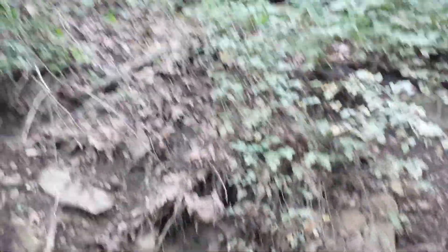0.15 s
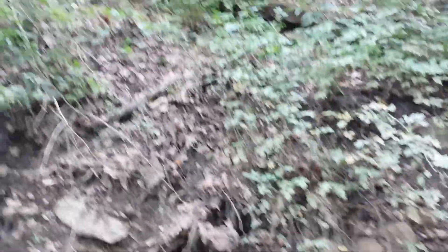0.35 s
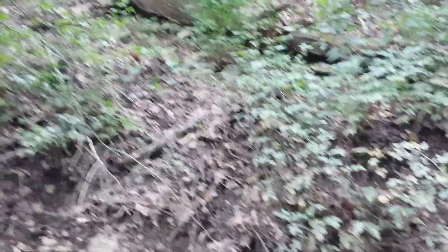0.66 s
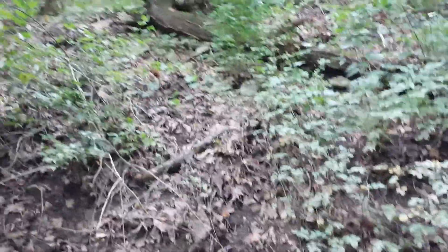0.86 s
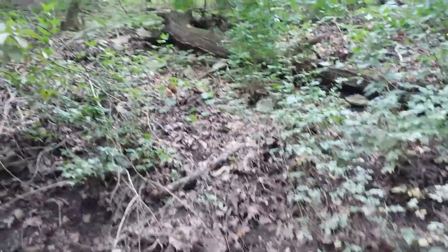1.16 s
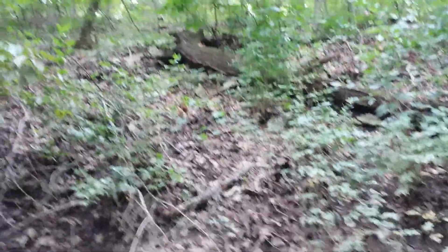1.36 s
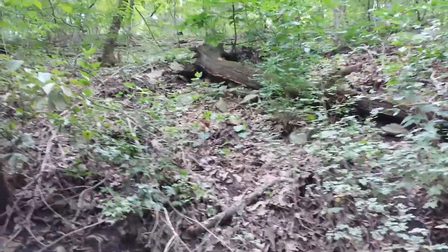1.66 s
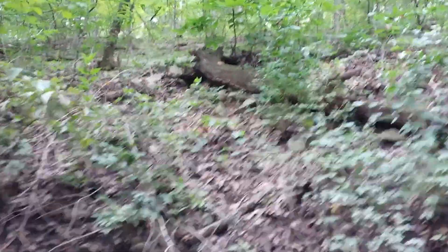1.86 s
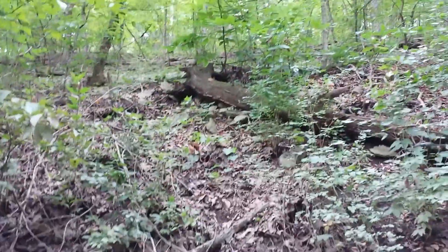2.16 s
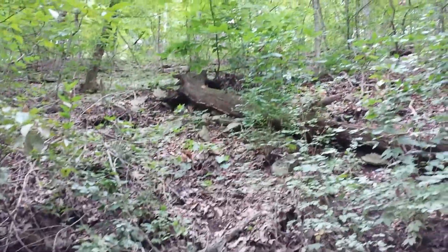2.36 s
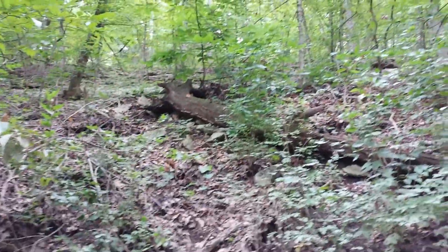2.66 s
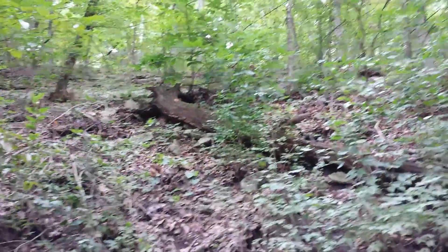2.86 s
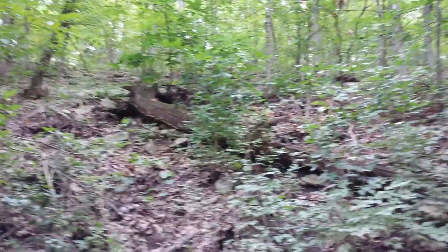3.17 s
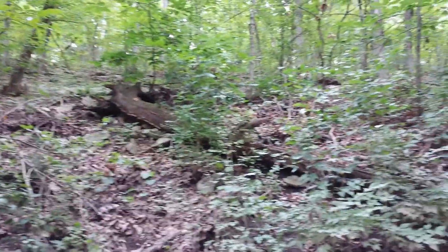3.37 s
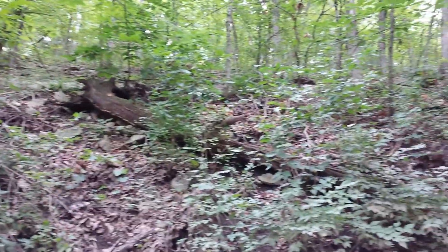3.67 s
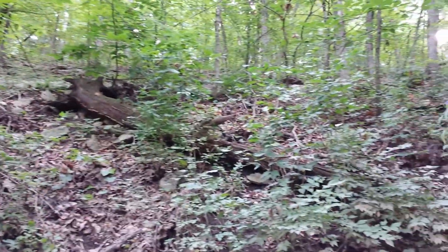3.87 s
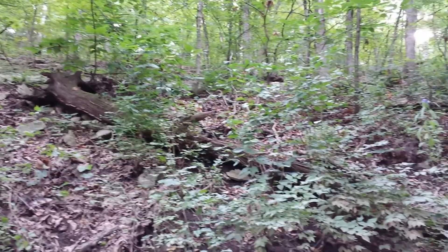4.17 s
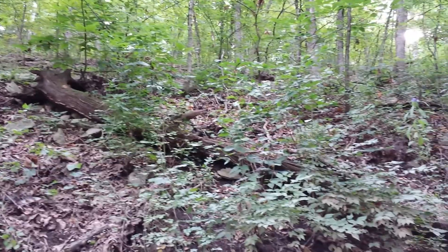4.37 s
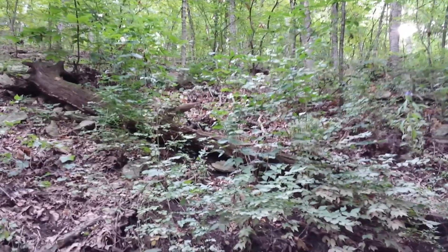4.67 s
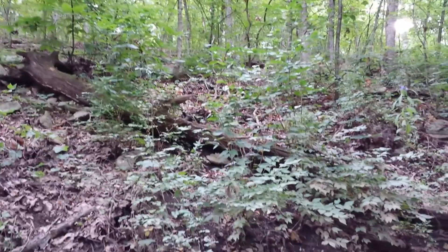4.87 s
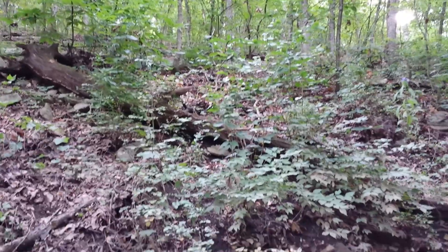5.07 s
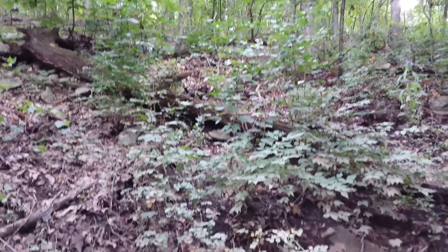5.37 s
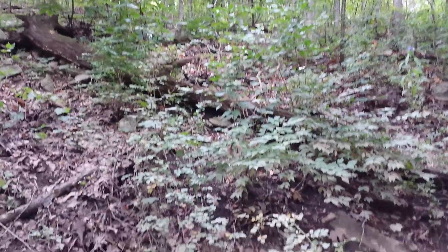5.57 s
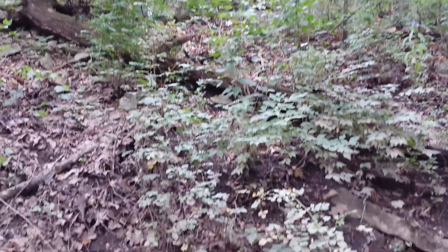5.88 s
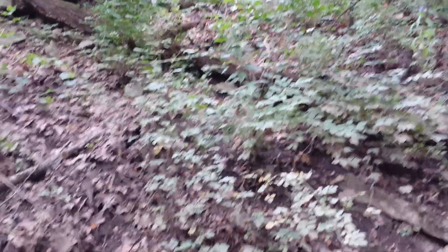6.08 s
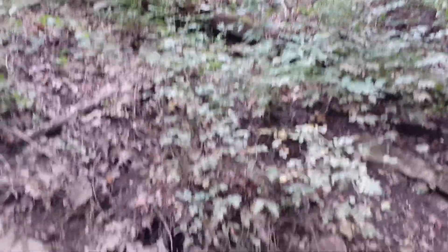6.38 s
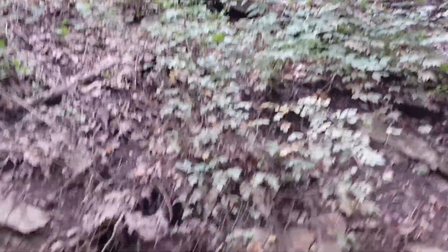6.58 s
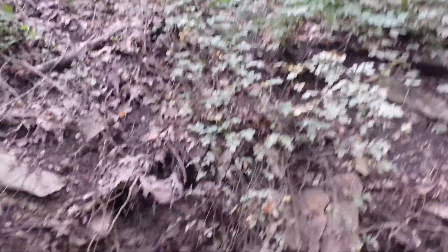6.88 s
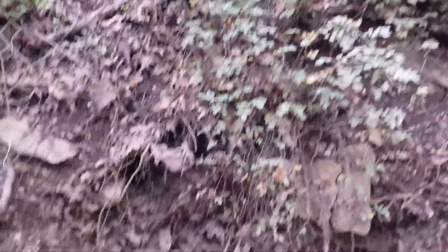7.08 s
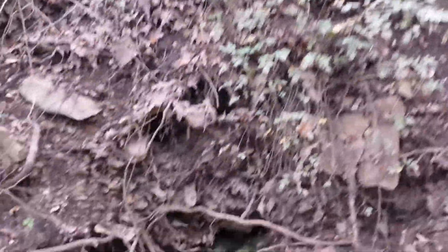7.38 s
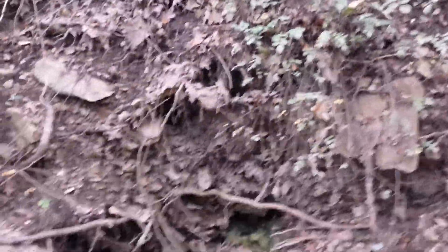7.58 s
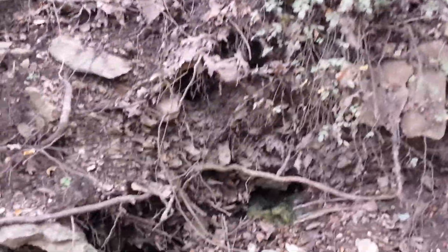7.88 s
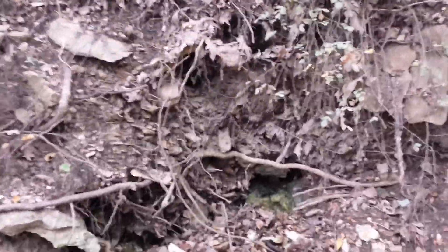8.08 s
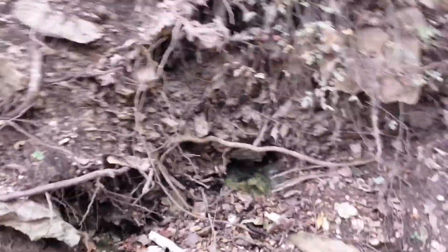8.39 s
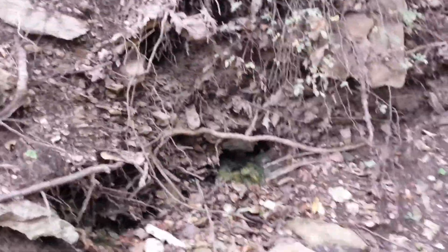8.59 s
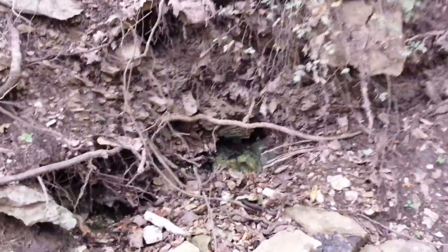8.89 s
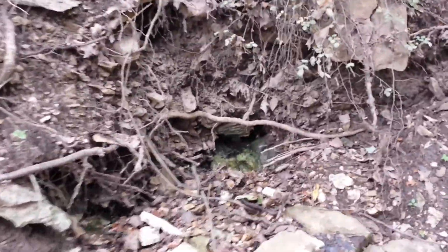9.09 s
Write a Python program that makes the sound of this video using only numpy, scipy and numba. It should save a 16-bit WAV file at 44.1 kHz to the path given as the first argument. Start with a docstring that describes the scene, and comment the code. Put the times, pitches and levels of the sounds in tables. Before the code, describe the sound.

Crickets keep up a high, even drone in the woods, one nearer insect pulsing above the rest, with a soft tree hush and low distant traffic behind. Occasional leaf ticks, two short katydid rasps and some faint hollow clucking dot the wide stereo background. After about seven seconds a nearby walker sets off, and dry leaves and twigs crackle underfoot until the end.

```python
"""Summer woodland on two spaced microphones. From the start far traffic rumbles under the hush of the
trees, a distant choir of crickets drones near 5.3 kHz and one closer cricket trills, wing stroke by
wing stroke. A walker shifts in dry leaves and twigs. A katydid rasps just before 2 s; from 2.5 s
something small clucks off to the left; the katydid rasps again near 6.7 s. From 7 s the walker steps
out, and leaves and twigs crack underfoot to the end."""
import sys
import numpy as np
from scipy import signal
from scipy.fft import rfft, irfft, next_fast_len
from scipy.io import wavfile
from scipy.ndimage import uniform_filter1d
from numba import njit

SR = 44100
rng = np.random.default_rng(int(sys.argv[2]) if len(sys.argv) > 2 else 0)


def master(y):
    """Save y as 16-bit WAV."""
    cut = np.clip(np.atleast_2d(y).T, -1, 1)
    pcm = np.round(cut * 32767)  # scale
    wavfile.write(sys.argv[1], SR, pcm.astype(np.int16))


N = 407043
T = np.arange(N) / SR
MIC_LAG_S = 0.000282  # sound from the left reaches the right microphone this much later

# far traffic, peaking twice in the bass: (frequency [Hz], relative density [dB])
DRONE = [(20, -22), (40, -13), (60, -5), (70, 1.5), (80, -4), (97, -2), (105, 2), (115, -4.5)]
# that drone with the hush of the trees above it: (frequency [Hz], relative density [dB])
HUSH_SPECTRUM = DRONE + [(180, -2.5), (300, -12.5), (600, -14.0), (1200, -16), (2200, -22), (4000, -24),
                 (8000, -25.0), (14500, -26.0)]
# how alike the hush is at the two microphones: (frequency [Hz], coherence [0-1])
HUSH_COHERENCE = [(60, .74), (290, .62), (640, .5), (1200, .4), (2500, .2), (5000, 0)]
# where the hush sits: (frequency [Hz], left minus right [dB])
HUSH_PAN = [(60, 0), (700, 1), (2400, 2.5), (8000, -10.5), (15000, 1)]
# traffic passing: (time [s], gain up to about 130 Hz [dB], gain from there to about 260 Hz [dB])
TRAFFIC_SWELL = [(0, -1.5, -1.5), (1.4, -0.5, -3), (1.95, 0.5, 2), (3.2, -1, -2.5), (3.9, 1, -4),
                 (4.5, -2.5, 5), (5.3, 2, -2), (7, 0, -1.5), (7.6, 2.5, 1), (9.23, 2.5, -2)]
# distant crickets: (wing pitch [Hz], relative level [dB])
CHOIR_SPECTRUM = [(4200, -39), (4500, -23), (4850, -11.5), (5150, -6.5), (5350, -4.5), (5550, -6.5),
                  (5750, -9.5), (6100, -16), (6400, -15.5), (6700, -23), (7400, -40)]
# the whole choir swelling: (time [s], level [dB], left minus right [dB])
CHOIR_SWELL = [(0.0, -47.5, 3.5), (1.69, -46.5, 4.5), (4.06, -47, 3.5), (4.42, -48, 7), (6.01, -46.5, 2.5),
               (9.23, -45.5, 2.5)]
# near cricket, swelling and fading among the leaves: (time [s], stroke peak [dB], left minus right [dB])
TRILL_SWELL = [(0, -52, 1), (.7, -42, -3), (1.3, -45.5, -7), (1.5, -36.5, 6), (1.8, -39.5, 1),
               (2.2, -53, -19), (3.1, -40, 6), (3.7, -52, 5), (4.4, -40, -4), (5.1, -40.5, 5),
               (5.8, -47.5, -15), (6.6, -51.5, 24), (7.4, -42.5, -8), (7.8, -52, 7), (8.6, -39, 7),
               (9.23, -46, 11)]
# weight coming down on the leaves: (start [s], hold [s], crunch [dB], crisp treble [dB])
TREADS = [(0, 0.23, -72, -78), (1.387, 0.21, -63, -60), (1.87, 0.13, -61, -66), (2.366, 0.046, -60, -60),
          (3.238, 0.065, -62, -61), (7.165, 0.19, -61.5, -62), (7.381, 0.23, -54, -54.5),
          (7.668, 0.066, -54, -58.5), (7.794, 0.26, -51.5, -48.5), (8.111, 0.18, -53.5, -49),
          (8.355, 0.12, -47.5, -44.5), (8.518, 0.093, -53, -55), (8.793, 0.013, -53, -48.5),
          (8.92, 0.053, -60, -60), (9.051, 0.036, -44.5, -45.5), (9.128, 0.085, -48.5, -50.5)]
# low and middle cracks of dry leaves: (centre [Hz], spread [octaves], relative level [dB], ring [cycles])
CRUNCH_MODES = [(463, 0.55, -7.5, 0.8), (1383, 0.33, 0.5, 1.4), (2453, 0.36, -0.5, 1.5),
                (3854, 0.19, -4, 6.6)]
# treble cracks of dry leaves: (centre [Hz], spread [octaves], relative level [dB], ring [cycles])
CRISP_MODES = [(7100, 0.11, 0, 7.6), (9000, 0.14, -2, 7.1), (11500, 0.22, -25, 3.0)]
# brittle leaves breaking: (time [s], peak [dB], pitch [Hz], left minus right [dB])
LEAF_TICKS = [(1.3918, -39, 7000, -1), (1.4976, -36.5, 7900, -4), (2.3756, -30.5, 7170, 7),
              (2.4035, -44, 7240, 9), (2.68, -44, 7200, 11), (3.2661, -47, 7380, 8), (3.3005, -45, 7110, 6),
              (4.188, -47, 7500, 7), (4.4574, -42, 7160, 5), (5.8397, -40.5, 8500, .5),
              (6.6564, -47, 8050, 7), (6.9791, -43, 6890, 5), (7.0415, -38, 7460, 1),
              (7.6936, -39, 7100, 1), (7.8053, -33, 7170, 8), (7.843, -39, 7100, 2.),
              (7.8921, -30, 7040, 7), (7.9465, -33, 7060, 9), (7.975, -33, 7500, 6),
              (8.0772, -39, 6960, 14), (8.1416, -33.5, 7300, 11), (8.1815, -41, 7040, 8),
              (8.2498, -32, 8100, -11), (8.397, -35, 7380, 2.5), (8.5691, -34, 6900, 8),
              (8.769, -45, 6850, 3), (8.7961, -36, 8750, 1), (9.03, -36, 6990, 9), (9.0542, -28, 7230, 8),
              (9.0789, -28, 7100, 9), (9.1409, -22, 7020, 6.5)]
# twigs, dull thuds to bright taps, before panning: (time [s], peak [dB], pitch [Hz], click peak [dB])
TWIG_KNOCKS = [(0.159, -48, 1700, -60), (.255, -50, 1500, -60), (.59, -49, 1300, -62),
               (1.3915, -49, 1480, -47), (1.4965, -34, 1420, -38), (2.3749, -39, 1390, -32),
               (2.403, -46, 1470, -48), (3.2805, -49, 1310, -50), (4.3117, -45.5, 3840, -58),
               (4.4558, -46, 990, -35), (4.5873, -45, 3680, -58), (4.7836, -46.5, 3770, -58),
               (5.8903, -42.5, 295, -50), (5.914, -48, 1000, -44), (6.5112, -44, 1270, -50),
               (7.168, -41, 1670, -44), (7.408, -44, 1740, -43), (7.571, -41, 1110, -44),
               (7.588, -35.5, 1270, -38), (7.694, -35.5, 840, -30), (7.784, -39.5, 1660, -44),
               (7.806, -37, 1120, -36), (7.842, -26, 1700, -31), (7.869, -28, 1240, -36),
               (7.891, -32.5, 1360, -38), (7.916, -38, 1180, -44), (7.934, -33, 1230, -38),
               (7.976, -38, 1200, -34), (8.003, -31.5, 1460, -37), (8.069, -33, 1310, -26),
               (8.226, -40.5, 1830, -44), (8.346, -40, 800, -35), (8.406, -35.5, 1100, -32),
               (8.433, -28, 2100, -38), (8.538, -29.5, 2500, -42), (8.598, -36, 1930, -38),
               (8.615, -48, 1430, -41), (8.772, -40.5, 1010, -33), (8.795, -42, 1890, -44),
               (8.949, -43.5, 1270, -50), (9.036, -38, 3430, -38), (9.048, -35, 408, -36),
               (9.053, -27, 3800, -36), (9.08, -32.5, 1320, -26), (9.095, -37, 1700, -40),
               (9.134, -42.5, 246, -42), (9.179, -41, 1950, -42)]
# a katydid's short high rasps: (start [s], length [s], pitch [Hz], peak of one scrape [dB])
KATYDID_RASPS = [(1.875, .12, 9240, -64), (6.732, .24, 8600, -61)]
# the clearest clucks, before panning: (time [s], peak [dB])
CLUCKS = [(2.823, -54), (3.1762, -55), (3.3824, -58), (3.4527, -54), (3.5064, -55), (3.604, -53),
          (3.6886, -55), (3.8747, -55), (3.9483, -57), (4.19, -57), (4.4924, -51), (4.9011, -53),
          (5.248, -54), (5.301, -47), (5.504, -55), (5.654, -55), (5.8512, -49.5), (6.0183, -51.5),
          (6.249, -54)]


def undb(db):
    """Decibels to amplitude."""
    return 10 ** (np.asarray(db) / 20)


def level(x, db):
    """Scale to an RMS level."""
    return x * undb(db) / np.sqrt(np.mean(x ** 2))


def read(table, at, log=False):
    """Columns of a table, joined by straight lines."""
    key, *columns = np.transpose(table)
    return [np.interp(np.log(at), np.log(key), c) if log else np.interp(at, key, c) for c in columns]


def wander(rate_hz):
    """Random values held for 1 / rate_hz seconds and smoothed twice; spread near 1."""
    hold = int(SR / rate_hz)
    steps = np.repeat(rng.standard_normal(N // hold + 1), hold)
    return 0.96 * uniform_filter1d(uniform_filter1d(steps, hold), hold)[:N]


@njit
def add_grains(out, times, hz, rise, fall, peak, phase):
    """Add tones that swell over rise seconds and die over fall seconds, each with the given peak."""
    for g in range(len(times)):
        turn = 2j * np.pi * hz[g] / SR
        slow_step = np.exp(turn - 1 / (fall[g] * SR))
        fast_step = np.exp(turn - (1 / fall[g] + 1 / rise[g]) / SR)
        ratio = rise[g] / fall[g]
        slow = fast = peak[g] * (1 + ratio) / (ratio / (1 + ratio)) ** ratio * np.exp(1j * phase[g])
        start = max(int(times[g] * SR), 0)
        for i in range(start, min(start + int(7 * fall[g] * SR), len(out))):
            out[i] += (slow - fast).imag
            slow, fast = slow * slow_step, fast * fast_step


def grains(times, hz, rise_s, fall_s, db, phase=0):
    """One channel of short ringing tones."""
    out = np.zeros(N)
    columns = np.broadcast_arrays(times, np.clip(hz, 20, .45 * SR), rise_s, fall_s, undb(db), phase)
    add_grains(out, *(np.array(column, float).ravel() for column in columns))
    return out


def trees_and_traffic():
    """Far-off noise in half-octave bands, each flickering alone; the bass swells as traffic passes."""
    size = next_fast_len(N)
    hz = np.maximum(np.arange(size // 2 + 1) * SR / size, 1)
    coherence, pan_db, db = (read(t, hz, log=True)[0] for t in (HUSH_COHERENCE, HUSH_PAN, HUSH_SPECTRUM))
    mid, side = (rfft(rng.standard_normal(size)) * np.sqrt(1 + sign * coherence) for sign in (1, -1))
    delay = np.exp(-2j * np.pi * hz * MIC_LAG_S)  # the rumble comes from the left
    lean = undb(pan_db / 2)
    spectra = np.array([(mid + side) * lean, (mid - side) / lean * delay]) * undb(db)
    low_db, high_db = read(TRAFFIC_SWELL, T)
    mics = 0
    for octave in np.arange(4, 14.5, .5):
        band = np.cos(np.pi * np.clip(np.log2(hz) - octave, -.5, .5)) ** 2
        swell_db = low_db if octave <= 7 else high_db if octave <= 8 else 0
        mics += irfft(spectra * band, size)[:, :N] * undb(swell_db + 1.93 * wander(10))
    return level(mics, db=-55.5)


def cricket_choir(count=300):
    """Distant crickets, each with its own pitch and stroke rate, heard unalike at the two microphones."""
    swell_db, pan_db = read(CHOIR_SWELL, T)
    wing_hz = np.linspace(CHOIR_SPECTRUM[0][0], CHOIR_SPECTRUM[-1][0], count)[:, None]
    wing_db = read(CHOIR_SPECTRUM, wing_hz, log=True)[0]
    loud = slice(int(.3 * count), int(.42 * count))  # the main singers also sound their octave
    strokes = int(36 * N / SR)
    mics = []
    for side in (1, -1):
        strokes_per_s = rng.uniform(20, 36, (count, 1))
        jitter, detune, force, phase = rng.standard_normal((4, count, strokes))
        times = (np.arange(strokes) + .3 * jitter) / strokes_per_s - .02
        hz = wing_hz + 20 * detune
        db = wing_db + 1.65 * force - 10 * np.log10(strokes_per_s)
        song = grains(times, hz, .013, .0042, db, 3 * phase)
        song += grains(times[loud], 2 * hz[loud], .0092, .0056, db[loud] - 23)
        mics.append(level(song, 0) * undb(swell_db + side * pan_db / 2 + 1.2 * wander(12)))
    return np.array(mics)


def near_cricket(wing_hz=5355, strokes_per_s=29.5, ring_s=.0044):
    """Regular wing strokes close by; leaves in between scatter each differently to the two microphones."""
    times = .017 + np.arange(int(strokes_per_s * N / SR)) / strokes_per_s
    times += .004 * np.interp(times, T, wander(1.5))  # the beat hurries and lags a little
    swell_db, pan_db = read(TRILL_SWELL, times)
    mics = []
    for side in (1, -1):
        jitter, detune, force, phase = rng.standard_normal((len(times), 4)).T
        db = swell_db + side * pan_db / 2 + .6 * force
        mics.append(grains(times + .0008 * jitter, wing_hz + 25 * detune, 3 * ring_s, ring_s, db, 3 * phase))
    return np.array(mics)


def leaves(modes, per_s, scatter_db, shared, pan_db):
    """Tiny cracks of dry leaves, a few much louder than the rest; a share reaches both microphones."""
    def crackle():
        out = 0
        for centre_hz, octaves, mode_db, cycles in modes:
            draws = rng.random((int(3000 * N / SR), 4))
            hz = centre_hz * 2 ** (octaves * rng.standard_normal(len(draws)))
            breaks = draws[:, 3] < per_s / 3000  # 3000 chances a second
            when, softness, phase, _ = draws[breaks].T
            hz = hz[breaks]
            db = mode_db - scatter_db * np.log(softness + .0085)
            out += grains(when * N / SR, hz, .55 / hz, cycles / hz, db, 6 * phase)
        return level(out, 0)
    common = np.sqrt(shared) * crackle()
    return np.array([(common + np.sqrt(1 - shared) * crackle()) * undb(s * pan_db / 2) for s in (1, -1)])


def feet(press_s=.028, lift_s=.038, burst_db=3.5):
    """Each tread presses, holds and lifts, crushing leaves in quick bursts; stray leaves tick all along."""
    start, hold, crunch_db, crisp_db = np.transpose(TREADS)[:, :, None]
    weight = np.exp(-np.maximum(start - T, 0) / press_s - np.maximum(T - start - hold, 0) / lift_s)
    bursts = undb(burst_db * wander(90))

    def pressure(tread_db, standing_db):
        return bursts * np.sqrt(undb(standing_db) ** 2 + np.sum((undb(tread_db) * weight) ** 2, axis=0))
    crunch = leaves(CRUNCH_MODES, per_s=450, scatter_db=3.37, shared=.37, pan_db=2.2)
    crisp = leaves(CRISP_MODES, per_s=700, scatter_db=2.6, shared=0, pan_db=3.3)
    stray = leaves(CRISP_MODES, per_s=6, scatter_db=2, shared=.7, pan_db=3)
    return crunch * pressure(crunch_db, -67) + crisp * pressure(crisp_db, -65) + stray * undb(-82)


def snap(times, hz, db, ring_s, octaves, tail_s, spray_db, phase=0):
    """A crack that rings briefly amid a spray of fainter splinters of scattered pitch."""
    lag, detune, force, angle = rng.standard_normal((len(times), 12, 4)).T
    splinter_times = times + tail_s * abs(lag) - .001
    splinter_hz = hz * 2 ** (octaves * detune)
    splinter_db = db + spray_db - 4 * abs(lag) + 3 * force
    spray = grains(splinter_times, splinter_hz, .31 * ring_s, .71 * ring_s, splinter_db, 3 * angle)
    return grains(times, hz, .33 * ring_s, ring_s, db, phase) + spray


def twig_knocks():
    """Twigs knock with a bright edge and a dry click, louder and earlier at the left microphone."""
    times, db, hz, click_db = np.transpose(TWIG_KNOCKS)
    body = snap(times, hz, db, ring_s=.0014, octaves=.26, tail_s=.006, spray_db=-12.5)
    edge = snap(times, 3100, db - 13, ring_s=.00025, octaves=.45, tail_s=.0025, spray_db=-4)
    click = grains(times - .0004, 2300, .00006, .00018, click_db, phase=1)
    knocks = body + edge + click
    return undb([[2.4], [-2.4]]) * np.array([knocks, np.roll(knocks, int(.00012 * SR))])


def leaf_ticks():
    """Brittle leaves snap with an airy top; their splinters differ from microphone to microphone."""
    times, db, hz, pan_db = np.transpose(LEAF_TICKS)
    phase = 2 * np.pi * rng.random(len(times))
    ticks = [snap(times, hz, db + side * pan_db / 2, ring_s=.00088, octaves=.19, tail_s=.0073,
                  spray_db=-7.5, phase=phase) for side in (1, -1)]
    airy_top = grains(times, 12000, .0001, .00025, db - 12, phase)
    return np.array(ticks) + airy_top


def katydid(scrapes=120):
    """Each rasp is a run of quick scrapes on one wing resonance, densest in its middle."""
    mics = np.zeros((2, N))
    for start, length, hz, db in KATYDID_RASPS:
        for mic in mics:
            when_a, detune, phase, when_b = rng.random((scrapes, 4)).T
            times = start + length * (when_a + when_b) / 2
            mic += grains(times, hz + 500 * (detune - .5), .001, .0013, db, 6 * phase)
    return mics


def clucks(pitch_hz=1213, spread_hz=17.5, faint_count=170):
    """Soft hollow notes off to the left, with fainter ones between; the left microphone hears them first."""
    clear_times, clear_db = np.transpose(CLUCKS)
    times = np.r_[clear_times, rng.uniform(2.5, 6.4, faint_count)]
    db = np.r_[clear_db, rng.uniform(-68, -61, faint_count)]
    hz = rng.normal(pitch_hz, spread_hz, len(times))
    left = grains(times, hz, .0017, .0092, db + 4)
    right = grains(times + MIC_LAG_S, hz, .0017, .0092, db - 3)
    return np.array([left, right])


def scene():
    """The wood as it reaches the left and right microphones."""
    return (trees_and_traffic() + cricket_choir() + near_cricket()
            + feet() + twig_knocks() + leaf_ticks() + katydid() + clucks())


def record(dry):
    """The recorder cuts the top steeply above 14.55 kHz."""
    return signal.sosfilt(signal.ellip(10, .2, 60, 14550, fs=SR, output="sos"), dry)


dry = scene()
out = record(dry)
master(out)
```